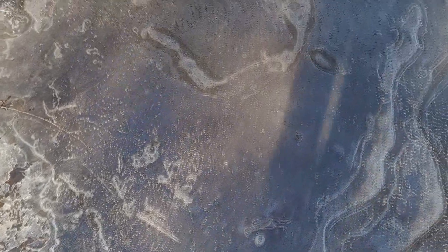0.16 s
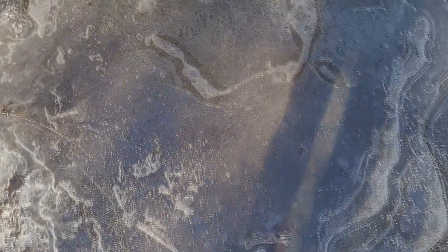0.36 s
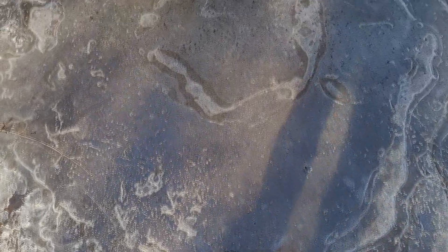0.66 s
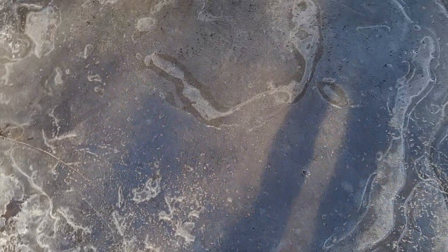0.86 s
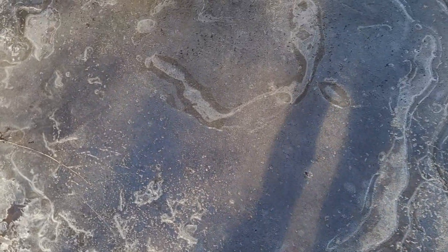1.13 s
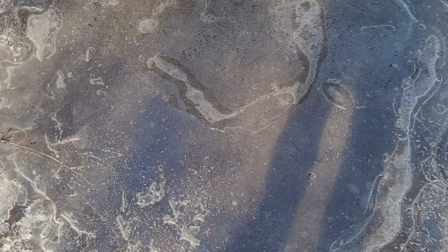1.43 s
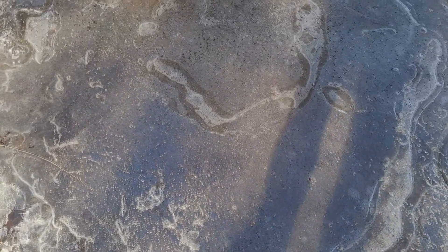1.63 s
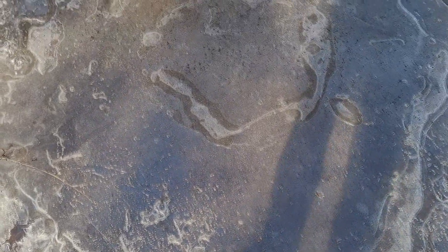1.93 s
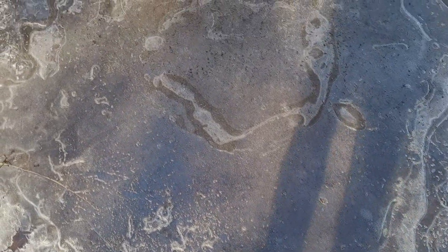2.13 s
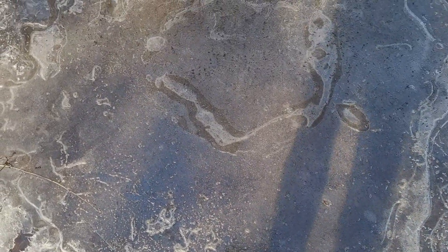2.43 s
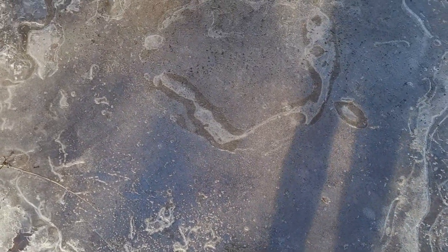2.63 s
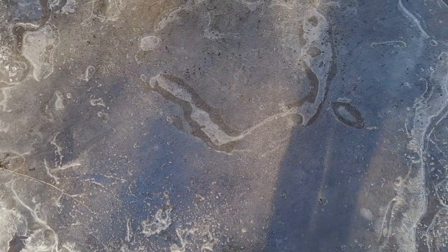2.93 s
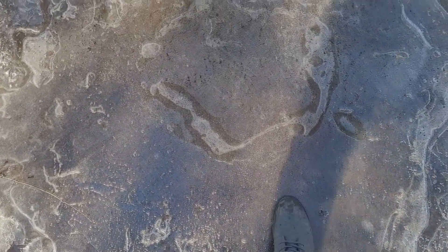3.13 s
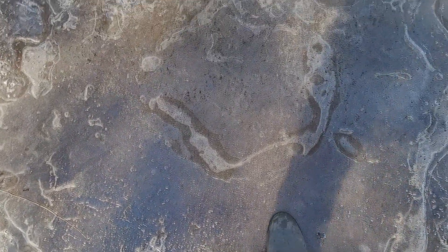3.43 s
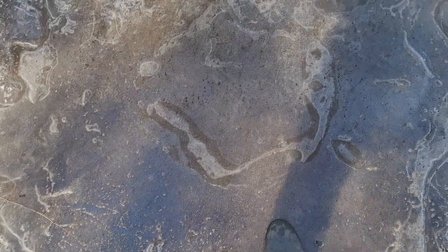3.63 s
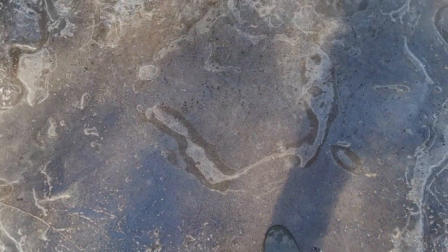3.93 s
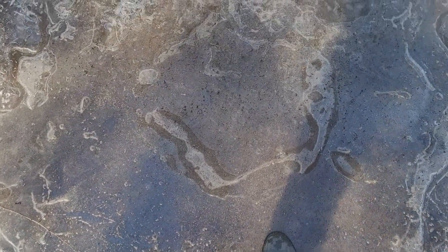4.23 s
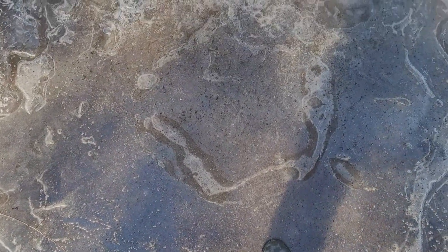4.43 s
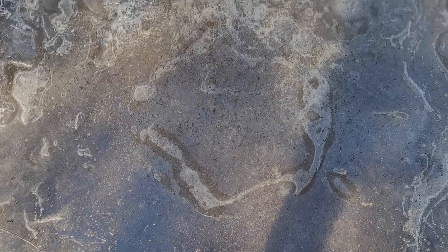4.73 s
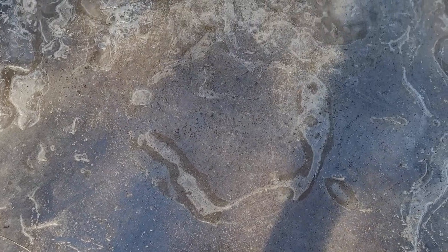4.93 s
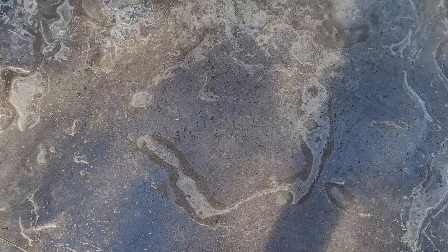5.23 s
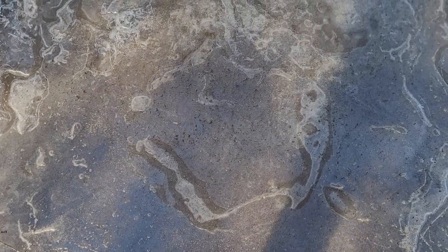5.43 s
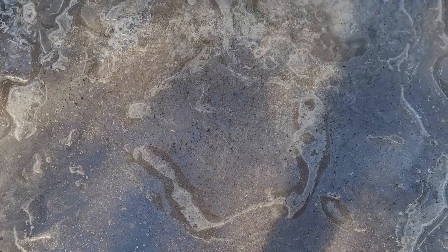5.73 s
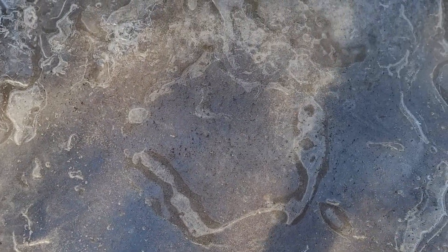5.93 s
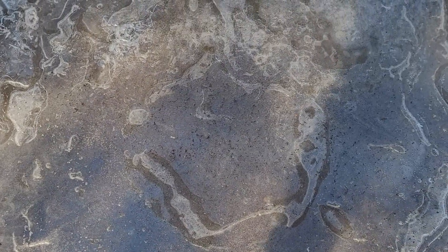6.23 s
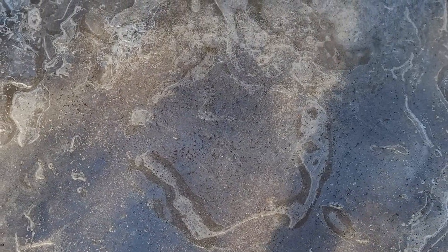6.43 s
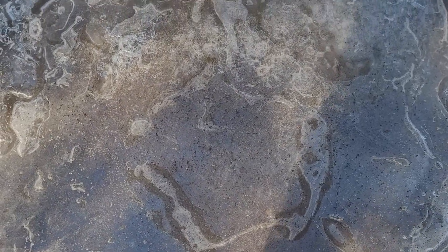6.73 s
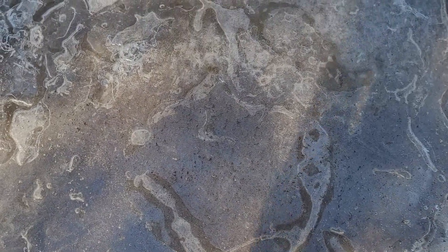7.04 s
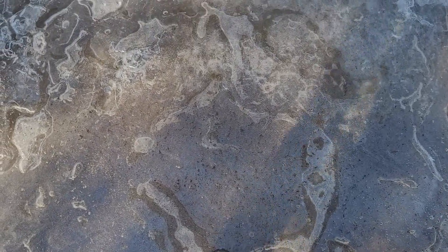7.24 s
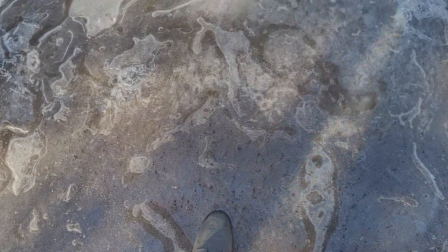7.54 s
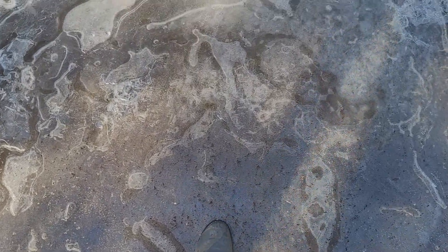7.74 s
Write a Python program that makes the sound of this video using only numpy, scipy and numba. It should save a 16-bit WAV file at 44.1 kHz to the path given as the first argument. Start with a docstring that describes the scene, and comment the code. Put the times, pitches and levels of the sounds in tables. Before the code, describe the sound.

Close, dry stereo sound of an ice sheet breaking beneath boots in the open air. Irregular grainy snaps carry short, woody plate rings and fine, glassy crackle; heavier pressure adds low hollow knocks. Rubber soles grind splinters with rough, uneven scrapes. Activity comes in separate bursts with near-quiet gaps, strongest just after three seconds and near seven, over a low wavering traffic rumble and faint hiss.

```python
"""Frozen puddle: boots shift their weight on thin ice, a metre or so below a hand-held phone.
Each fracture is a burst of grainy noise plus decaying plate modes; a crackle of smaller ones follows the load.
Heavier steps push two deep modes of the whole sheet; the soles scrape as noise with an uneven level.
Far traffic is filtered noise, a wavering rumble under a faint hiss. Two ports hear the treble differently."""
import sys
import numpy as np
from scipy import signal
from scipy.fft import rfft, irfft, next_fast_len
from scipy.io import wavfile
from scipy.ndimage import uniform_filter1d
from numba import njit

SR = 44100
rng = np.random.default_rng(int(sys.argv[2]) if len(sys.argv) > 2 else 0)


def log_audio(samples):
    """Write samples as a 16-bit WAV file to the path given in sys.argv[1]."""
    # one column per channel
    frames = np.atleast_2d(samples).T
    # limit to full scale, then quantise
    limited = np.clip(frames, -1, 1)
    pcm = np.round(limited * 32767).astype(np.int16)
    wavfile.write(sys.argv[1], SR, pcm)


def amplitude_ratio(level_db):
    """Convert a level in decibels to the matching linear amplitude (field) ratio."""
    exponent = np.asarray(level_db, float) / 20
    return 10 ** exponent


N = 347067
TIME_S = np.arange(N) / SR
FREQ_HZ = np.maximum(np.linspace(0, SR / 2, next_fast_len(N // 2 + 1000, True) + 1), 1)
FFT_SIZE = 2 * len(FREQ_HZ) - 2

# Clear fractures. Each row: start in seconds, snap level in dB before band trims, plate ring re snap in dB,
# top fizz re snap in dB (both before trims), pitch of the breaking piece in Hz.
FRACTURES = [(0.072, -50.5, -12, 3.5, 343), (0.2067, -34.5, -4.5, -3.5, 550), (0.431, -32.5, -4, -6, 485),
             (0.4463, -35, 1.5, -5, 269), (0.6264, -35, -1, 1, 496), (0.7048, -32.5, -4, -0.5, 540),
             (0.7683, -42.5, 11.5, -24, 516), (0.8975, -19.5, 1, -6.5, 466), (1.082, -37, 10.5, -8, 392),
             (1.7748, -52, 10, -1.5, 470), (1.9865, -39, -5.5, -0.5, 625), (2.003, -15.5, -3, -4, 382),
             (2.0589, -30, -8, -6, 312.5), (2.0733, -30.5, -1, -12.5, 520), (2.1338, -17.5, -1, -5.5, 643),
             (2.1687, -16, -8, -5, 552), (2.189, -23.5, -4.5, -4.5, 434), (2.3179, -33, -10, -9, 560),
             (2.4316, -28.5, -15, -2, 588), (2.7922, -34.5, -12, -3.5, 675), (2.8441, -24, -1, -6, 685),
             (2.937, -45.5, -14.5, 0.5, 290), (2.975, -42.5, -8, 4, 448), (3.0067, -39, -27.5, -4, 460),
             (3.0407, -35.5, 5, -9.5, 260), (3.0952, -15, -10.5, -9, 483), (3.1738, -20, -7, -12.5, 480),
             (3.2424, -20.5, -8.5, -5.5, 400), (3.262, -19, -7.5, -8.5, 646), (3.2911, -10.5, -2, -8, 424),
             (3.3344, -18, -4.5, -5.5, 543), (3.3406, -20.5, -4.5, -13.5, 436.5), (3.406, -21, -2, -8, 630),
             (3.4395, -13, -3, -6.5, 539), (3.504, -23.5, -6, -4, 536), (3.5217, -27, -13, -6.5, 418),
             (3.606, -20, -6.5, -5, 755), (3.6338, -27.5, -8.5, -4.5, 656), (4.0689, -43, -7.5, 1.5, 403),
             (4.6498, -23, -0.5, -5, 554), (4.6648, -17.5, -5.5, -6, 514), (4.6785, -27, -5, -10, 530),
             (4.707, -15, -7.5, -6, 564), (4.747, -26.5, 1.5, -1, 404), (4.7526, -21, -16.5, -1.5, 430),
             (4.8178, -23.5, -4, -2, 490), (4.871, -32, -27, 2.5, 460), (4.8789, -28, -6, -7.5, 435),
             (4.9282, -27.5, -8, -6, 529), (4.949, -25.5, -17, -0.5, 377), (4.969, -17, -12, -0.5, 420),
             (4.9771, -21.5, -3.5, -14.5, 450), (4.9912, -25.5, -0.5, -10, 700),
             (5.123, -36.5, -10, 3.5, 450), (5.1542, -31, -0.5, -6, 654), (5.1618, -22.5, -9.5, -0.5, 630),
             (5.254, -40, -11, 2, 520), (5.3453, -27.5, -9, -1, 640), (5.3966, -32.5, -7.5, -1.5, 580),
             (5.4268, -36, -10.5, 3.5, 480), (5.4735, -26, -9, -6, 710), (5.5118, -36.5, -11.5, 0, 600),
             (5.612, -26, -4, 0, 650), (5.6637, -35.5, -2, 3, 470), (5.6829, -27.5, -8.5, -5, 625),
             (5.7293, -35.5, 1.5, -3, 704), (5.7762, -33.5, -17, 0.5, 640), (5.7914, -18, -5, -8, 635),
             (5.803, -25.5, -15, -2, 480), (5.838, -30.5, 3.5, -3.5, 550), (5.8565, -18.5, -6.5, -3.5, 666),
             (5.8637, -24.5, -7.5, -3.5, 506), (5.8981, -24, -6.5, -7, 610), (5.9155, -26, -2, 0, 634),
             (5.9666, -25, -9, -4, 530), (6.0163, -25, -0.5, -5, 500), (6.091, -25, -3, -0.5, 436),
             (6.164, -38.5, -15, 8, 460), (6.2025, -35, -6, 5, 500), (6.3099, -22, -8.5, -2.5, 740),
             (6.3384, -26.5, -7.5, 0, 630), (6.351, -32, -8.5, -3, 700), (6.611, -44, -4, 9, 463),
             (6.797, -39, -19, 4, 510), (6.818, -38, -3, 9, 583), (6.8413, -34.5, 8.5, 9, 623),
             (6.8611, -15, -5, -7.5, 500), (6.8898, -15, -0.5, -3, 620), (6.899, -16.5, -6, -9.5, 670),
             (6.9364, -22, -6, -4, 630), (6.9516, -31.5, -4.5, 3, 620), (6.9794, -26.5, -4.5, -4, 610),
             (6.9896, -25.5, 0.5, 0, 610), (7.0166, -24, -13, 0, 485), (7.0299, -27.5, -3.5, -4.5, 518),
             (7.1067, -34.5, -5, -2.5, 460), (7.2025, -36.5, -7, 2, 544), (7.3343, -38.5, 2, -0.5, 370),
             (7.3907, -32.5, -11.5, 1, 526), (7.623, -47, -13, 6, 450), (7.7277, -53.5, 5, 10, 343),
             (7.836, -44, -8, 3, 310)]
# Boot load on the ice, driving crackle and scrape. Each row: time in seconds, load in dB before their offsets.
BOOT_LOAD = [(0.0, -78.5), (0.15, -70.5), (0.5, -64.5), (1.05, -72), (1.5, -89), (1.8, -93.5), (1.97, -58),
             (2.24, -51.5), (2.56, -92), (2.75, -81.5), (3.05, -64.5), (3.3, -49), (3.62, -57.5),
             (3.75, -65), (4.15, -86.5), (4.62, -82), (4.66, -52.5), (5.0, -54.5), (5.29, -61),
             (5.75, -53.5), (5.86, -39.5), (6.08, -42.5), (6.2, -57.5), (6.42, -61.5), (6.76, -67.5),
             (6.83, -45), (7.06, -35), (7.15, -54), (7.87, -69)]
# Modes of the broken pieces. Each row: frequency in Hz, relative level in dB.
PIECE_MODES = [(150, -4), (245, 7), (330, 0.5), (420, -0.5), (490, -3.5), (570, -2), (680, 5), (800, -0.5),
               (960, 1.5), (1150, -10.5), (1380, -10.5), (1700, -15)]
# Snap spectrum. Each row: frequency in Hz, relative density in dB per Hz.
SNAP_SPECTRUM = [(50, -28.5), (290, -8), (500, -20), (570, -2), (810, -12.5), (1130, -8.5), (1480, -3),
                 (1660, -8.5), (2160, -10.5), (4550, -9.5), (7170, -14.5), (8540, -27.5), (15100, -25),
                 (16500, -56.5)]
# The whole sheet over its air pocket gives under the heel. Each row: start in seconds,
# upper mode in dB, lower mode in dB, both before the push is smoothed.
SHEET_THUDS = [(0.537, -32, -50), (0.9, -41.5, -34), (2.011, -23, -32), (2.141, -20.5, -38),
               (3.044, -37, -33), (3.075, -18, -44), (3.12, -22, -34), (3.184, -29, -32.5),
               (3.294, -26, -26), (3.342, -29, -28.5), (3.443, -21, -24), (6.101, -31, -46),
               (6.87, -29, -41)]
# Modes of the sheet, upper then lower. Each row: nominal frequency in Hz, T60 in seconds.
SHEET_MODES = [(245, .13), (142, .16)]
# Scrape spectrum. Each row: frequency in Hz, relative density in dB per Hz.
SCRAPE_SPECTRUM = [(100, -30), (243, -3), (420, -8), (693, -8), (850, -13), (1470, -15), (1880, -20),
                   (2340, -16), (2850, -29), (6000, -48)]
# Sole slides. Each row: start in seconds, length before the fall in seconds, level in dB before it jitters.
SOLE_SLIDES = [(0.451, .12, -46.5), (0.72, .12, -73), (3.05, 0.097, -43), (6.788, .22, -36.5),
               (7.087, 0.39, -52.5)]
# Traffic spectrum, rumble to hiss. Each row: frequency in Hz, relative density in dB per Hz.
TRAFFIC_SPECTRUM = [(12, -51), (20, -47.5), (43, -6), (63, -2), (151, -10.5), (189, -19.5), (212, -19),
                    (273, -19.5), (361, -31.5), (599, -44.5), (816, -40.5), (3140, -70), (6530, -63),
                    (8650, -74), (16500, -67.5)]
# Swell of the rumble. Each row: time in seconds, gain in dB before it wavers.
RUMBLE_SWELL = [(0, -47.5), (1, -48), (2.7, -51), (5.6, -50.5), (7, -49.5), (7.87, -48)]
# Port difference for the ice below. Each row: frequency in Hz, left minus right in dB.
ICE_TILT = [(100, 2), (700, 0), (1300, -0.5), (2400, -3), (4400, 2), (7000, 3), (9000, -8.5), (15000, -11)]
# Port difference for the far field. Each row: frequency in Hz, left minus right in dB.
FAR_TILT = [(40, 6.5), (110, -0.5), (700, 1.5), (1290, 9.5), (4400, 12), (8120, 15.5), (15000, -8)]
# Phase between ports. Each row: frequency in Hz, lead of the left in radians.
LEFT_LEAD = [(0, 0.5), (1210, -1.65), (1460, -2.5), (5000, -15), (9470, -29.5), (16700, -80.5)]
# Likeness of the ports. Each row: frequency in Hz, shared part of the power from 0 to 1.
SHARED_PART = [(30, .58), (60, .9), (130, .93), (260, .88), (500, .93), (900, .7), (2000, .42), (5000, .32),
               (15000, .25)]

BODY_HZ, FIZZ_HZ = 2600, 8000  # band splits of a snap
T60_AT_250_HZ_S = .125
AGAIN_DB, AGAIN_S = -8, .007  # the crack runs on and strikes the piece once more
AFTER_DB, AFTER_S = -34, .046  # a break raises the run of small ones: re snap, fall time
CRACKLE_RE_LOAD_DB = 4
SIZE_SPREAD_DB = 3.2  # mean step of a small break above the faintest, roughly
SCRAPE_RE_LOAD_DB = -3
GRIND_DB, GRIND_S = -16, .026  # the sole grinds the splinters: re snap plus ring, fall time
SLIDE_RISE_S, SLIDE_FALL_S = .03, .09


def on_hz(table):
    """Reads a (Hz, value) table at every bin, linear in log frequency."""
    hz, value = np.transpose(table)
    return np.interp(np.log(FREQ_HZ), np.log(hz), value)


def ports(shared, own, gain, tilt):
    """Two ports: a shared part, phase-shifted on the left, plus each port's own; coloured and tilted."""
    alike = np.clip(on_hz(SHARED_PART), 0, 1)
    lead = np.exp(1j * np.interp(FREQ_HZ, *np.transpose(LEFT_LEAD)))
    both = rfft(shared, FFT_SIZE) * np.array([lead, np.ones_like(lead)])
    mix = np.sqrt(alike) * both + np.sqrt(1 - alike) * rfft(own, FFT_SIZE)
    side_gain = amplitude_ratio(np.array([[.5], [-.5]]) * on_hz(tilt))
    return irfft(mix * gain * side_gain, FFT_SIZE)[:, :N]


def unit_rms(gain):
    """Scales a spectral gain to unit RMS over the bins."""
    return gain / np.sqrt(np.mean(gain ** 2))


def walk(rate_hz):
    """Random levels held 1 / rate_hz and slewed twice; spread near 1."""
    hold = int(SR / rate_hz)
    steps = np.repeat(rng.standard_normal(N // hold + 1), hold)
    return 1.3 * uniform_filter1d(uniform_filter1d(steps, hold), hold)[:N]


def fade(start_s, level_db, rise_s, fall_s):
    """Power envelope: a quick rise and an exponential fall at each start."""
    at = np.clip((start_s * SR).astype(int), 0, N - 1)
    kicks = np.bincount(at, amplitude_ratio(2 * level_db), N)
    rise = np.exp(-1 / (rise_s * SR))
    fall = np.exp(-2 / (fall_s * SR))  # fall_s is the amplitude time constant
    return signal.lfilter([1 - rise], np.convolve([1, -rise], [1, -fall]), kicks)


@njit
def ring(out_size, start, size, pole):
    """Each mode is struck once and dies away, stopped at 0.3 % of its start."""
    out = np.zeros(out_size)
    for k in range(len(start)):
        z, i, end = size[k], start[k], abs(size[k]) * 3e-3
        while i < out_size and abs(z) > end:
            out[i] += z.imag
            z *= pole[k]
            i += 1
    return out


def strike(start_s, hz, t60_s, size):
    """Damped modes as rotating complex poles, rung from their start times."""
    pole = np.exp(2j * np.pi * hz / SR - np.log(1000) / (t60_s * SR))
    return ring(N, (start_s * SR).astype(np.int64).ravel(), size.ravel() + 0j, pole.ravel())


def ice():
    """Ruptures are grainy noise under each burst, with a weaker stutter after; pieces and sheet ring too."""
    start_s, snap_db, ring_db, fizz_db, piece_hz = fractures()
    out, colour = 0, amplitude_ratio(on_hz(SNAP_SPECTRUM))
    body = 1 / (1 + (FREQ_HZ / BODY_HZ) ** 6)
    above = 1 / (1 + (FIZZ_HZ / FREQ_HZ) ** 12)
    # a thick piece rings more and snaps duller; no two shards share a colour
    dull_db = 0.18 * (ring_db + 6.5) + 0.99 * rng.standard_normal(len(start_s))
    # each band: level dB, share of spectrum, rise s, burst s, tail re burst dB, tail s
    bands = [(snap_db - 3.0 + dull_db, body, .0006, .0024, -15, .016),
             (snap_db - 2.5 - dull_db, (1 - body) * (1 - above), .0008, .0024, -16, .014),
             (snap_db + fizz_db + 0.5, above, .0005, .0008, -19, .012)]
    for level_db, share, rise_s, burst_s, tail_db, tail_s in bands:
        stutter = amplitude_ratio(2.5 * walk(300))
        tail = stutter ** 2 * fade(start_s, level_db + tail_db, .0066, tail_s)
        power = np.maximum(fade(start_s, level_db, rise_s, burst_s) + tail, 0)
        noise = np.sqrt(power) * amplitude_ratio(1.2 * walk(1500)) * rng.standard_normal((3, N))
        out = out + ports(noise[0], noise[1:], unit_rms(colour * np.sqrt(share)), ICE_TILT)
    tone = plate(start_s, snap_db + ring_db - 2.5, piece_hz) + sheet()
    # the sheet is broad: each port also hears a farther part, a little later
    later = np.array([np.roll(tone, 95), np.roll(tone, 50)])
    return out + ports(tone, later, np.ones_like(FREQ_HZ), ICE_TILT)


def fractures():
    """Clear breaks plus small ones at random times, levelled by the load: start, snap, ring, fizz, pitch."""
    chance = rng.random((3000, 5))
    start_s = chance[:, 0] * N / SR
    # sizes have a long tail: many faint ticks, a few clear ones
    size_db = -SIZE_SPREAD_DB * np.log(np.e * (.01 + chance[:, 1]))
    snap_db = np.interp(start_s, TIME_S, load()) + CRACKLE_RE_LOAD_DB + size_db
    ring_db, fizz_db = -12 + 6 * chance[:, 2], -7 + 9 * chance[:, 3]
    small = [start_s, snap_db, ring_db, fizz_db, 300 + 500 * chance[:, 4]]
    return np.hstack([np.transpose(FRACTURES), small])


def load():
    """Strain in the ice in dB: boot load plus the aftershocks of each clear break."""
    start_s, snap_db = np.transpose(FRACTURES)[:2]
    boots = amplitude_ratio(2 * np.interp(TIME_S, *np.transpose(BOOT_LOAD)))
    return 10 * np.log10(boots + fade(start_s, snap_db + AFTER_DB, .002, AFTER_S))


def plate(start_s, level_db, piece_hz, octaves=0.59, spread=0.088, uneven_db=3):
    """Each break frees a piece: modes near its pitch speak at once, then again, scattered; high ones die faster."""
    hz, mode_db = np.transpose(PIECE_MODES)
    chance = rng.standard_normal((len(start_s), 6, len(hz)))
    distance = np.log2(hz / piece_hz[:, None]) / octaves
    near = amplitude_ratio(mode_db) * np.exp(-.5 * distance ** 2)
    near = near * amplitude_ratio(level_db[:, None]) / np.sqrt(np.sum(near ** 2, axis=1, keepdims=True))
    t60_s = T60_AT_250_HZ_S * (250 / hz) ** .6 + 0 * near
    first = -near * amplitude_ratio(uneven_db * chance[:, 0]) * np.exp(.8j * chance[:, 1])
    out = strike(start_s[:, None] + 0 * near, hz * np.exp(spread * chance[:, 2]), t60_s, first)
    late_s = start_s[:, None] + AGAIN_S * abs(chance[:, 3])
    again = near * amplitude_ratio(AGAIN_DB) * chance[:, 5]
    return out + strike(late_s, hz * np.exp(spread * chance[:, 4]), t60_s, again)


def sheet(push_s=.002):
    """Two deep modes of the sheet, pushed softly by the heel."""
    table, (hz, t60_s) = np.array(SHEET_THUDS), np.transpose(SHEET_MODES)
    flat = np.ones((len(table), 2))
    wobble = np.exp(0.012 * rng.standard_normal(flat.shape))
    tone = strike(table[:, :1] * flat, hz * wobble, t60_s * flat, -amplitude_ratio(table[:, 1:]))
    return uniform_filter1d(tone, int(push_s * SR))


def sole():
    """Rubber drags over wet ice and grinds splinters: stick-slip as jittering noise in a few broad resonances."""
    start_s, snap_db, ring_db = np.transpose(FRACTURES)[:3]
    power = amplitude_ratio(2 * (np.interp(TIME_S, *np.transpose(BOOT_LOAD)) + SCRAPE_RE_LOAD_DB))
    power = power + fade(start_s, snap_db + ring_db + GRIND_DB, .0027, GRIND_S)
    for slide_s, length_s, slide_db in SOLE_SLIDES:
        rise = (TIME_S - slide_s) / SLIDE_RISE_S
        fall = 1 + (slide_s + length_s - TIME_S) / SLIDE_FALL_S
        power = power + amplitude_ratio(2 * slide_db) * np.clip(np.minimum(rise, fall), 0, 1) ** 4
    slips = np.sqrt(power) * amplitude_ratio(2.8 * walk(60) + 2.6 * walk(500))
    noise = slips * rng.standard_normal((3, N))
    return ports(noise[0], noise[1:], unit_rms(amplitude_ratio(on_hz(SCRAPE_SPECTRUM))), ICE_TILT)


def traffic():
    """Distant rumble and faint hiss from filtered noise; the bass swells and wavers, the hiss stays smoother."""
    noise = rng.standard_normal((3, N))
    gain = unit_rms(amplitude_ratio(on_hz(TRAFFIC_SPECTRUM)))
    low = 1 / (1 + (FREQ_HZ / 400) ** 4)
    swell_db = np.interp(TIME_S, *np.transpose(RUMBLE_SWELL))
    bass = ports(noise[0], noise[1:], gain * low, FAR_TILT) * amplitude_ratio(swell_db + 1.5 * walk(10))
    hiss = ports(noise[0], noise[1:], gain * (1 - low), FAR_TILT) * amplitude_ratio(-41.5 + 1.0 * walk(3.2))
    return bass + hiss


def scene():
    """Ice and soles over the far rumble."""
    return ice() + sole() + traffic()


def top_cut(x):
    """Nothing passes above the cut-off."""
    return signal.sosfilt(signal.butter(12, 17150, fs=SR, output="sos"), x)


def record(dry):
    """The microphones lose the deepest bass: second-order high-pass at 38 Hz."""
    cut = signal.butter(2, 38., "high", fs=SR, output="sos")
    mix = signal.sosfilt(cut, dry)
    return top_cut(mix)


dry = scene()
out = record(dry)
log_audio(out)
```